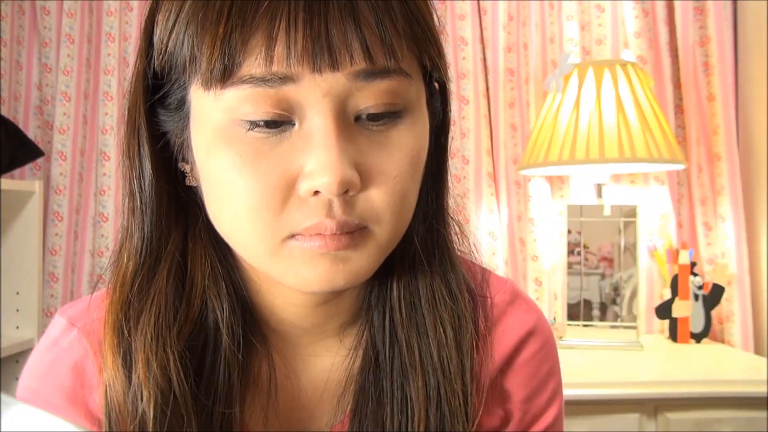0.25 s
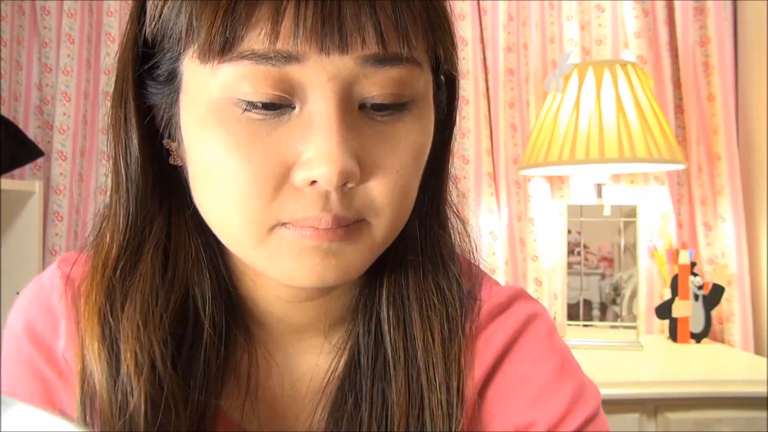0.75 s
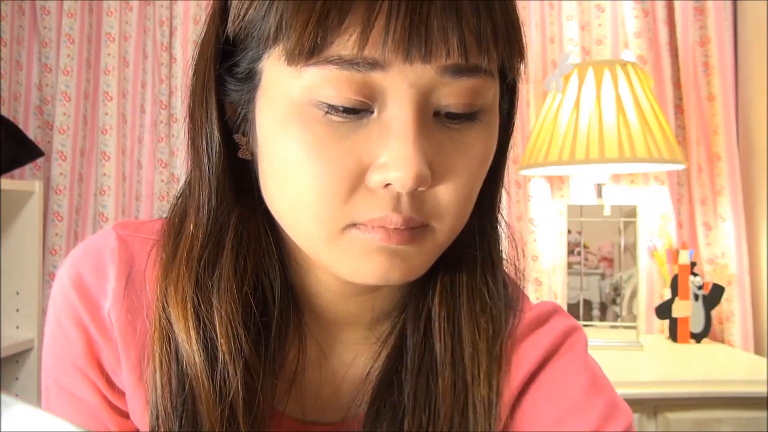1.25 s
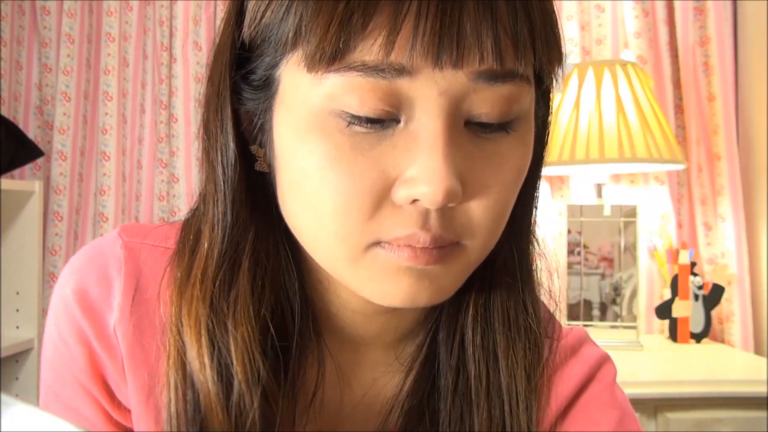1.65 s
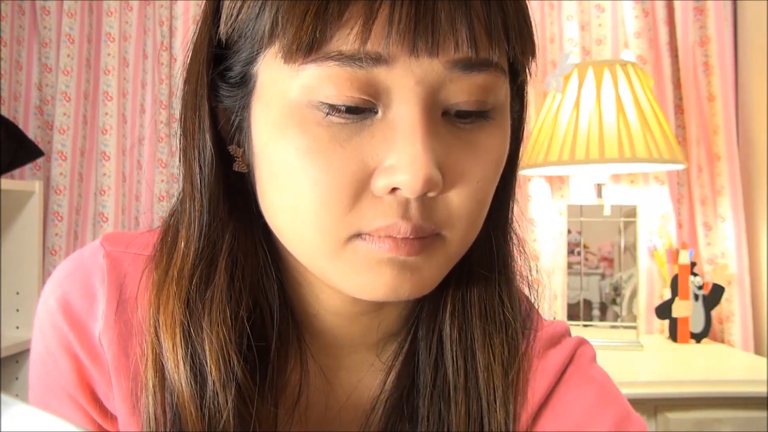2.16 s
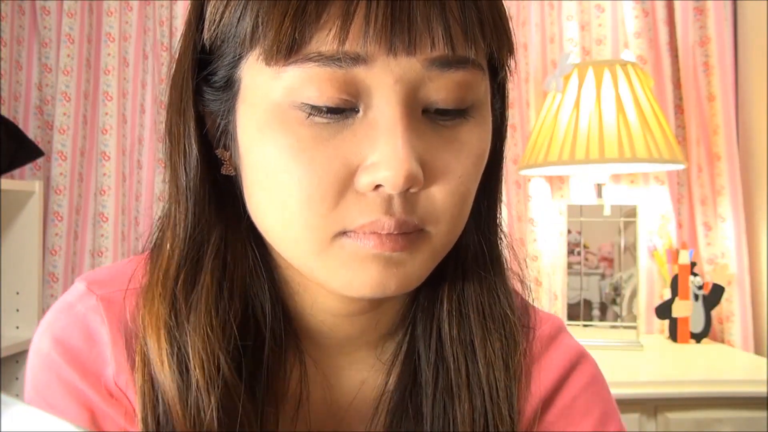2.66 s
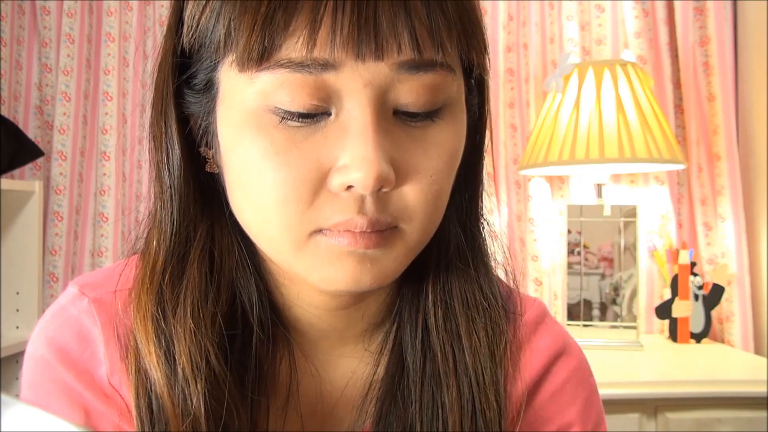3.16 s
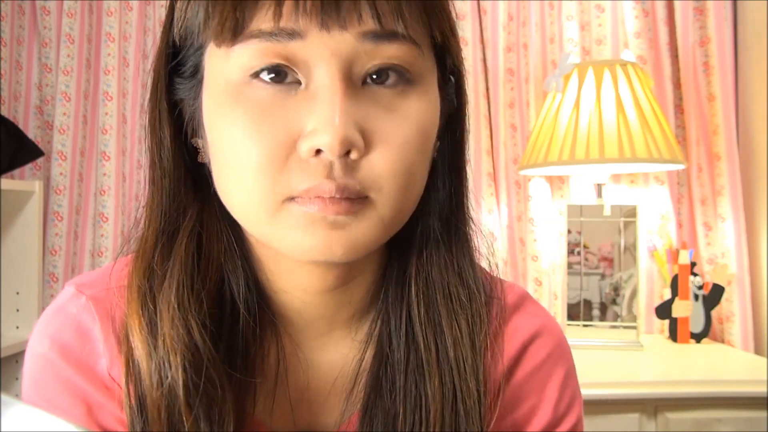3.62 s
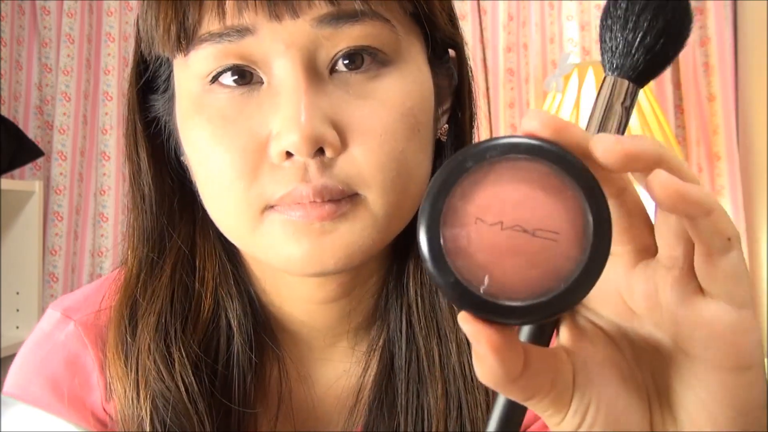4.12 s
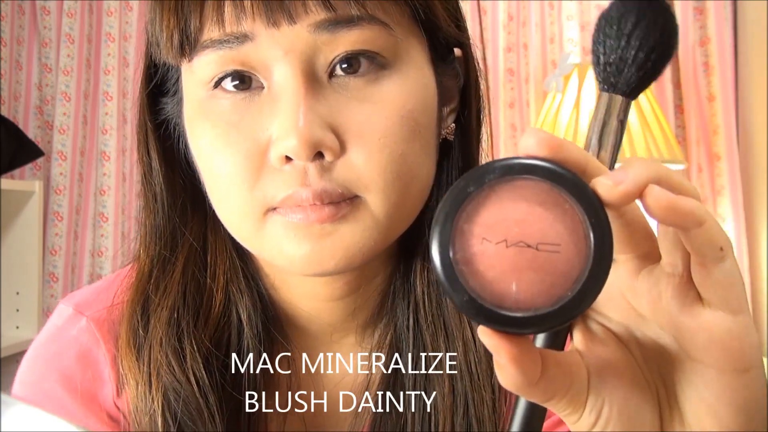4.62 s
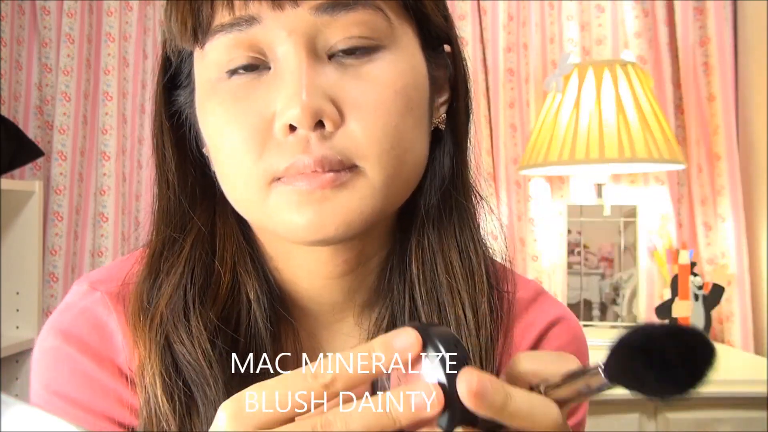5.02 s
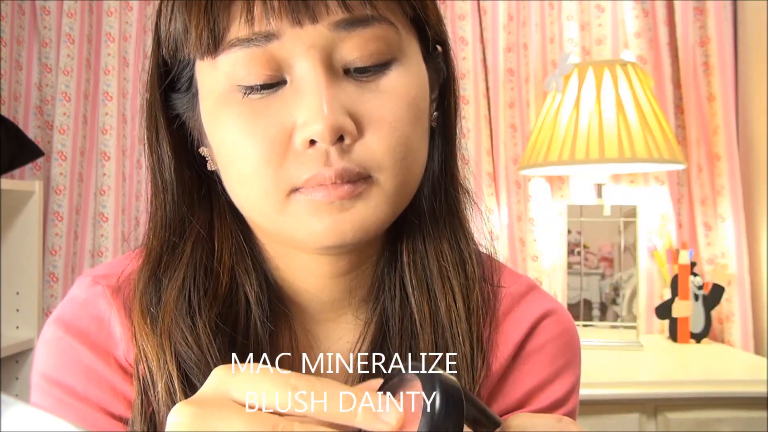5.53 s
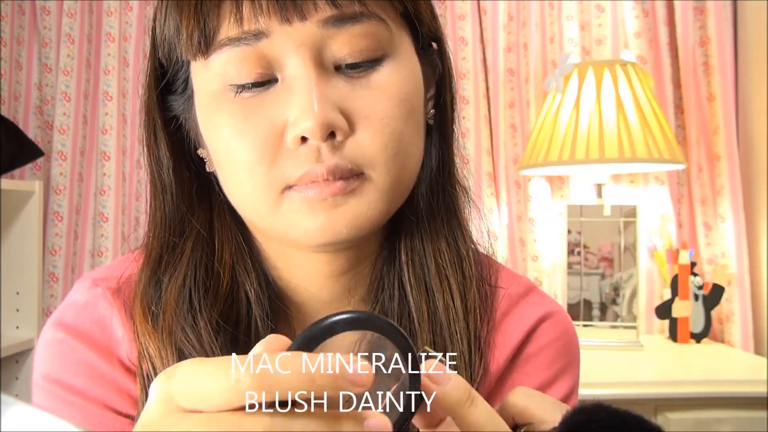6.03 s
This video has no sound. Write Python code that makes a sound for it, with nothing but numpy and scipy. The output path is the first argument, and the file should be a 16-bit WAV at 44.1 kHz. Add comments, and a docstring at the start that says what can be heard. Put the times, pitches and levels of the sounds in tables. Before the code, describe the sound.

In a small curtained room, plastic cosmetics containers knock, scrape and clack on a wooden tabletop before a compact's lid snaps sharply open.

```python
"""A small, curtained room with a wooden dressing table, where plastic makeup containers are handled.
A heavy one thuds down, slides and is let go; lighter ones are nudged and clack together; then a compact
is lifted and its catch ticks and snaps open. Struck bodies are sums of decaying modes, slides are stick-slip
pulses, and a camera's lens motor is faint resonant noise that comes and goes over steady room noise and hiss.
Sharp treble makes the recorder's gain control turn everything down, heard most in the noise."""
import sys
import numpy as np
from scipy import signal
from scipy.fft import rfft, irfft
from scipy.io import wavfile
from scipy.ndimage import uniform_filter1d

SR = 44100
rng = np.random.default_rng(int(sys.argv[2]) if len(sys.argv) > 2 else 0)


def transcribe(signal):
    """Save signal, clipped to [-1, 1], as a 16-bit WAV file at the path in sys.argv[1]."""
    frames = np.atleast_2d(signal).T
    limited = np.clip(frames, -1, 1)
    pcm = np.round(limited * 32767).astype(np.int16)
    wavfile.write(sys.argv[1], SR, pcm)


N = 276948
TIME = np.arange(N) / SR   # s
SHORT_TIME = TIME[:SR // 4]   # a quarter second, long enough for any one contact
CUTOFF_HZ = 15900   # top of the recorded band

# modes of the table top under a container: pitch_hz, relative level_db, t60_s
TABLE_MODES = [(272, -10, .08), (457, -3, .1), (620, -5, .06), (686, 0, .06), (732, -3, .06),
               (835, -7, .04), (997, -3, .065), (1116, -9, .07), (1293, -3, .065), (1403, -8, .06),
               (1499, -6, .06), (1600, -9, .05), (1896, -10, .07), (2308, -8, .08), (2620, -11, .06),
               (2890, -9, .07), (3301, -7, .055), (3820, -15, .06), (4218, -14, .07), (5800, -20, .04),
               (7316, -21, .05)]


def from_db(db):
    """Decibels to gain."""
    return 10 ** (np.asarray(db) / 20)


def rms_one(x):
    """Scale to an rms of 1."""
    return x / np.sqrt(np.mean(x ** 2) + 1e-20)


def at_hz(points, hz):
    """Read a table on a log-frequency axis."""
    known_hz, value = np.transpose(points)
    return np.interp(np.log(np.maximum(hz, 1)), np.log(known_hz), value)


def cut(x, hz, kind, order=2):
    """Causal Butterworth filter."""
    safe_hz = np.clip(hz, 10, .45 * SR)
    return signal.sosfilt(signal.butter(order, safe_hz, kind, fs=SR, output="sos"), x)


def resonate(x, hz, width_hz):
    """One two-pole resonance with a gain of about 1 on top."""
    r = np.exp(-np.pi * width_hz / SR)
    feedforward = np.array([1, 0, -1]) * (1 - r * r) / 2
    feedback = [1, -2 * r * np.cos(2 * np.pi * hz / SR), r * r]
    return signal.lfilter(feedforward, feedback, x)


def add(track, start_s, sound):
    """Mix a sound into a track at its start time."""
    start = round(start_s * SR)
    track[start:start + len(sound)] += sound[:N - start]


def ring(modes, crack_db, crack_t60, spread_db=0):
    """A struck body: its modes, peak 1, plus a brief noise crack for many dense, heavily damped modes."""
    t = SHORT_TIME
    hz, db, t60 = np.transpose(modes)[:, :, None]
    db = db + spread_db * rng.standard_normal(db.shape)   # each spot of contact favours other modes
    swings = from_db(db - 60 * t / t60) * np.sin(2 * np.pi * hz * t)
    # neighbouring modes swing against each other
    tone = swings[::2].sum(axis=0) - swings[1::2].sum(axis=0)
    crack = rng.standard_normal(len(t)) * from_db(crack_db - 60 * t / crack_t60)
    return tone / np.abs(tone).max() + cut(crack, 400, "high")


def contact_pulse(low_hz, high_hz):
    """The single pressure pulse of a small object stopped or released abruptly; peak 1."""
    pulse = cut(signal.unit_impulse(SR // 4), [low_hz, high_hz], "band")
    return pulse / np.abs(pulse).max()


def room(x, first_s=0.0014, wall_hz=11000):
    """Dense reflections from furniture and walls: noise bands, each with its own decay, then dulled."""
    # room decay: pitch_hz, t60_s
    decay = [(300, 0.16), (2000, 0.097), (5000, 0.13), (9000, 0.094), (15000, 0.091)]
    t, edges_hz = SHORT_TIME, np.geomspace(150, 17000, 9)
    tail = 0
    for low_hz, high_hz in zip(edges_hz, edges_hz[1:]):
        t60 = at_hz(decay, np.sqrt(low_hz * high_hz))
        band = cut(rng.standard_normal(len(t)), [low_hz, high_hz], "band")
        tail = tail + band * from_db(-60 * t / t60)
    tail = tail * (t > first_s)
    tail = tail / np.linalg.norm(tail)   # unit energy before the walls dull it
    return signal.fftconvolve(x, cut(tail, wall_hz, "low", order=1))[:len(x)]


def background(level_db=-60):
    """Steady shaped noise: a room bed, wide in the bass, under nearly mono hiss."""
    # spectrum of room noise and microphone hiss: pitch_hz, relative level_db per Hz
    spectrum = [(15, -48), (25, -24), (43, -8), (75, -6), (113, -3), (204, -2.5), (246, -2.5), (445, -2),
                (537, -2.5), (631, -6), (684, -5), (2170, -11), (2700, -9), (5880, -17), (15500, -18.5)]
    # stereo width: pitch_hz, side_minus_mid_db
    width_curve = [(30, -9), (120, -8), (200, -8), (400, -13.5), (1000, -13), (3000, -22.5), (12000, -58)]
    # broad humps, halved when mixed: pitch_hz, width_hz, level_db before halving
    humps = [(435, 116, -6), (2720, 570, -5)]
    hz = np.fft.rfftfreq(N, 1 / SR)
    white = rfft(rng.standard_normal((2, N)))
    mid, side = white * from_db(at_hz(spectrum, hz)) * (hz < CUTOFF_HZ)
    side = side * from_db(at_hz(width_curve, hz))
    noise = irfft(mid + side * [[1], [-1]], N)
    noise = noise + sum(from_db(db) * resonate(noise, centre, width) for centre, width, db in humps) / 2
    return from_db(level_db) * rms_one(noise)


def lens_motor(ramp_s=0.034):
    """Each focusing run speeds up, holds and stops; its fine friction noise rings the lens barrel."""
    # motor runs: start_s, length_s, level_db
    runs = [(0.0, 0.16, -62), (0.562, 0.15, -58), (1.074, 0.22, -61.5), (1.9, 0.2, -65.5),
            (2.49, 0.11, -61), (3.012, 0.099, -65), (3.932, 0.13, -67), (5.089, 0.24, -63),
            (5.3, 0.32, -67)]
    # barrel resonances: pitch_hz, width_hz, relative level_db
    barrel = [(3500, 1900, -3.5), (5110, 320, 3), (8300, 760, -13.5), (12300, 900, -11)]
    drive = 0
    for start_s, length_s, db in runs:
        to_nearest_end_s = np.minimum(TIME - start_s, start_s + length_s - TIME)
        drive = drive + from_db(db) * np.clip(to_nearest_end_s / ramp_s, 0, 1)
    whir = sum(from_db(db) * resonate(rng.standard_normal(N), hz, width) for hz, width, db in barrel)
    return drive * rms_one(whir)


def slides(slips_per_s=1300, uneven_db=3):
    """Uneven stick-slip pulses make a container chatter; a heavy one shakes the table, a light one scratches."""
    # slides on the wood: start_s, length_s, direct level_db, chatter_hz, weight 0-1
    strokes = [(0.935, 0.071, -43.5, 724, 0.95), (1.03, 0.096, -51.5, 830, 0.8),
               (1.122, 0.039, -45, 707, 0.84), (1.21, 0.055, -43, 790, 0.8),
               (2.03, 0.029, -45.5, 806, 0.11), (2.101, 0.011, -54, 780, 0.26),
               (2.133, 0.022, -49, 760, 0.5), (2.19, 0.014, -55, 1310, .3),
               (2.27, 0.031, -49.5, 1370, 0.16), (2.931, 0.011, -51, 1254, 0.2),
               (2.957, 0.017, -50.5, 1580, 0.16), (2.976, 0.038, -51, 900, 0.17)]
    wander_hz_per_s = 4900   # a short nudge squeaks on a narrow pitch; a longer slide blurs it
    shake_db, shake_gain_db = -12.5, 11   # table's answer at weight 0; added at weight 1
    grit_db, grit_loss_db = -2, 19   # scratching at weight 0; lost at weight 1
    out, t = np.zeros(N), SHORT_TIME
    table_thump = cut(ring(TABLE_MODES, crack_db=-28, crack_t60=.02), 1280, "low")
    for start_s, length_s, db, chatter_hz, weight in strokes:
        stroke = np.sqrt(np.maximum(np.sin(np.pi * np.minimum(t / length_s, 1)), 0))
        slip_times = rng.random(len(t)) < slips_per_s / SR
        slips = stroke * slip_times * from_db(uneven_db * rng.standard_normal(len(t)))
        slips = cut(slips, 380, "high", order=4)
        chatter = resonate(slips, chatter_hz, wander_hz_per_s * length_s)
        chatter = rms_one(cut(chatter, 1.4 * chatter_hz, "low", order=3))
        wood = rms_one(signal.fftconvolve(slips, table_thump)[:len(t)])
        grit = rms_one(cut(slips, [1250, 2900], "band", order=3))
        sound = chatter + from_db(shake_db + shake_gain_db * weight) * wood
        sound = sound + from_db(grit_db - grit_loss_db * weight) * grit
        # the level counts over the slide's own length, not the whole quarter second
        add(out, start_s, from_db(db) * rms_one(sound) * np.sqrt(length_s * SR / len(t)))
    return out + from_db(-4.5) * room(out)


def clacks(tick_db=-14):
    """Hollow cases tap each other with a tiny bright tick; light touches radiate little bass."""
    # containers tapping each other: start_s, level_db before filtering, lowest_hz
    taps = [(1.064, -31, 1300), (2.054, -29.5, 700), (2.211, -31.5, 700), (2.2566, -25, 700),
            (2.31, -17.5, 2490), (3.848, -46, 1500), (5.064, -40.5, 1500)]
    # modes of a hollow plastic case: pitch_hz, relative level_db, t60_s
    case_modes = [(768, -1, 0.042), (1260, 2.5, 0.022), (1513, 9, 0.014), (2180, 7, 0.019),
                  (2320, 6.5, 0.0064), (2750, 10.5, 0.0087), (3360, 1.5, 0.013), (3665, 3.5, 0.014),
                  (4480, 5, 0.005)]
    bright_hz = 3500   # plastic on plastic always makes about the same short contact
    out = np.zeros(N)
    for start_s, db, low_hz in taps:
        tap = ring(case_modes, crack_db=-7.5, crack_t60=0.014, spread_db=2)
        tap = cut(tap, low_hz, "high", order=1)
        body = cut(tap, bright_hz, "low", order=5)
        tick = from_db(tick_db) * cut(tap, [5000, 10000], "band")
        add(out, start_s, from_db(db) * (body + tick))
    return out + from_db(-3) * room(out)


def knocks(pulse_db=8):
    """A sharp thud and the table's ring; softer contacts wake fewer upper modes, the small top little bass."""
    # containers meeting the table: start_s, level_db before filtering, contact brightness_hz
    hits = [(0.8959, -17.5, 4560), (0.9054, -33, 2620), (1.147, -31.5, 453), (1.2214, -21, 600),
            (1.2608, -16.5, 557), (2.3108, -34, 1090), (2.887, -44, 1610)]
    out = np.zeros(N)
    for start_s, db, bright_hz in hits:
        thud = from_db(pulse_db) * contact_pulse(low_hz=510, high_hz=2880)
        blow = ring(TABLE_MODES, crack_db=-2.0, crack_t60=0.033) + thud
        add(out, start_s, from_db(db) * cut(blow, bright_hz, "low"))
    out = cut(out, 225, "high", order=4)
    return out + from_db(-8.5) * room(out)


def snaps(pulse_db=-8):
    """Lids and catches let go with a tiny pulse and a ring of milliseconds; the room supplies the tail."""
    # snaps: start_s, level_db before filtering, lowest_hz, brightness_hz
    releases = [(1.2265, -18.5, 3820, 10100), (1.2459, -24, 3040, 9000), (1.2573, -17.5, 3800, 9000),
                (3.475, -33, 11000, 15000), (4.959, -44, 1500, 12000), (5.6345, -23, 1880, 2600),
                (5.7526, -13, 705, 15500), (6.195, -37, 3000, 14000)]
    # modes of a lid damped by the fingers: pitch_hz, relative level_db, t60_s
    lid_modes = [(1700, 0, .0075), (2780, -1, .006), (4900, -8, .007), (5600, -5, .005), (7500, -14, .004),
                 (9000, -6, .003), (11200, -17, .004), (14400, -9, .004)]
    lifted_s = 3.3   # from here on the compact is in the hand, closer to the microphone
    far_room_db, near_room_db = -1, -4.5   # room level for a snap on the table, and in the hand
    out = np.zeros(N)
    lid = ring(lid_modes, crack_db=-28, crack_t60=.006)
    release = lid + from_db(pulse_db) * contact_pulse(low_hz=647, high_hz=6540)
    for start_s, db, low_hz, bright_hz in releases:
        snap = cut(cut(release, low_hz, "high"), bright_hz, "low", order=1)
        snap = from_db(db) * snap
        room_db = far_room_db if start_s < lifted_s else near_room_db
        add(out, start_s, snap + from_db(room_db) * room(snap))
    return out


def scene():
    """Handling is straight ahead; its reflections differ a little between the two microphone ports."""
    handling = slides() + clacks() + knocks() + snaps()
    side_reflections = from_db(-24.5) * room(handling, wall_hz=17000) * [[1], [-1]]
    return background() + lens_motor() + handling + side_reflections


def gain_control(x, threshold_db=-32, most_db=7.0, release_db_per_s=0.5, attack_s=0.0061):
    """Sharp treble peaks pull the gain down within milliseconds; it creeps back slowly."""
    treble = cut(x.mean(axis=0), 7100, "high")
    power = uniform_filter1d(treble ** 2, size=44)   # over 1 ms
    level_db = 10 * np.log10(np.abs(power) + 1e-12)
    over_db = np.clip(10 * (level_db - threshold_db), 0, most_db)   # steep, up to the most it may cut
    recovery_db = release_db_per_s * TIME
    held_db = np.maximum.accumulate(over_db + recovery_db) - recovery_db
    r = np.exp(-1 / (attack_s * SR))
    reduction_db = signal.lfilter([1 - r], [1, -r], held_db)
    return x * from_db(-reduction_db)


def record(dry):
    """Gain control, then a steep cut of the top."""
    steep_cut = signal.ellip(10, .1, 80, CUTOFF_HZ, fs=SR, output="sos")
    return signal.sosfilt(steep_cut, gain_control(dry))


dry = scene()
out = record(dry)
transcribe(out)
```